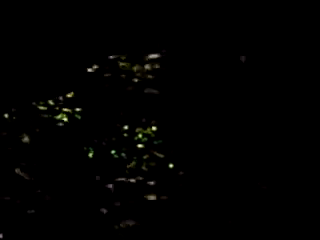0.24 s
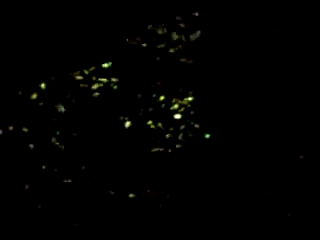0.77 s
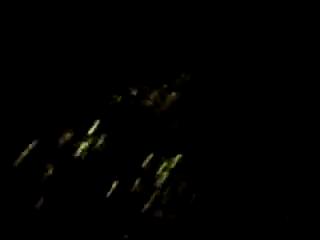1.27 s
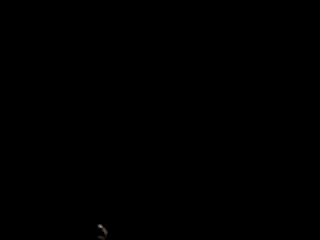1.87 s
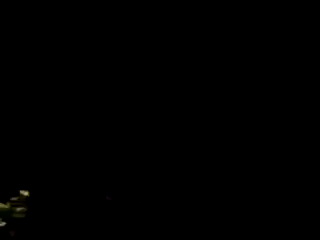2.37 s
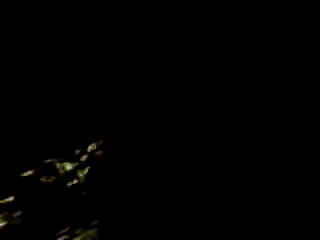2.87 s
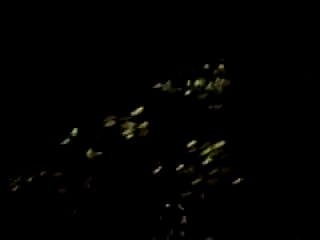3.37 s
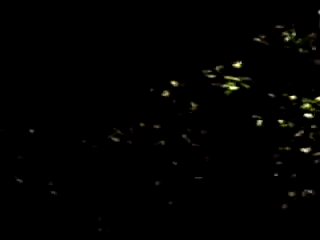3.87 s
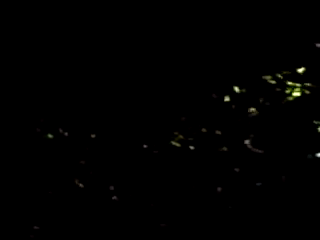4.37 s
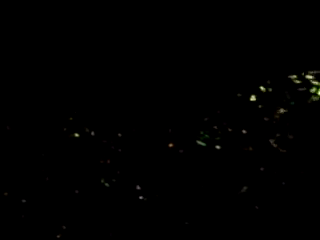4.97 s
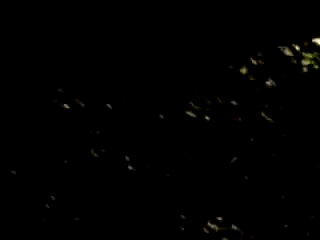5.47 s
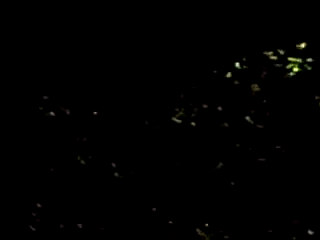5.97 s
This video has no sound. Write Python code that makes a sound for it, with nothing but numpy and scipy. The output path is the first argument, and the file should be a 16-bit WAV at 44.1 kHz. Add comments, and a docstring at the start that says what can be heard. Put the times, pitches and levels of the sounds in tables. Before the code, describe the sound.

Toads trill and far frogs click above a low rumble, while a nearby frog clicks loudly once through and another briefly croaks.

```python
"""Low rumble, a distant engine's hum and toads trilling near 2 kHz, heard from a pond's edge at night.
Far frogs give rising runs of clicks, smeared by the trees. Close to the microphone one frog gives a
single run that slows, swells and rises in pitch: each click is a snap of the larynx that rings its
throat and its tightening vocal sac. Near the end another frog croaks once, in quick buzzy notes."""
import sys
import numpy as np
from scipy import signal
from scipy.fft import rfft, irfft
from scipy.io import wavfile

SR = 44100
rng = np.random.default_rng(int(sys.argv[2]) if len(sys.argv) > 2 else 0)


def generate_wav(sig):
    """Save sig (samples, or channels by samples) to the path in sys.argv[1] as 16-bit PCM at SR."""
    pcm = np.round(np.clip(np.atleast_2d(sig).T, -1, 1) * 32767).astype(np.int16)
    wavfile.write(sys.argv[1], SR, pcm)


N = 274743
T = np.arange(N) / SR
FREQS = np.fft.rfftfreq(N, 1 / SR)


def undb(db):
    """Decibels to gain."""
    return 10 ** (np.asarray(db) / 20)


def level(x, db):
    """Scale to an rms level."""
    return x * undb(db) / np.sqrt(np.mean(x ** 2))


def fader(points):
    """Gain at every sample from (time_s, level_db) points."""
    time_s, db = np.transpose(points)
    return undb(np.interp(T, time_s, db))


def colour(points):
    """Gain at every frequency from (frequency_hz, level_db) points."""
    hz, db = np.transpose(points)
    return undb(np.interp(np.log(FREQS + 1), np.log(hz), db))


def resonance(f, hz, width_hz):
    """Gain of a steep resonance at the frequencies f."""
    return 1 / (1 + ((f - hz) / width_hz * 2) ** 2 / 2) ** 2


def causal(gain):
    """Minimum-phase filter with the given gains: nothing sounds before the blow."""
    cepstrum = irfft(np.log(gain), N)
    fold = np.concatenate([[1], 2 * (T[1:] < N / SR / 2)])
    return np.exp(rfft(cepstrum * fold))


def noise(gain):
    """Noise of rms 1 with the given spectrum."""
    return level(irfft(rfft(rng.standard_normal(N)) * gain, N), 0)


def band(hz, width_hz):
    """A band of noise of rms 1."""
    return noise(resonance(FREQS, hz, width_hz))


def drift(rate_hz):
    """Smooth random drift of spread 1."""
    return noise(np.exp(-(FREQS / rate_hz) ** 2) * (FREQS > 0))


def add(out, start_s, sound):
    """Mix a sound in, if it starts within the scene."""
    i = int(start_s * SR)
    if 0 <= i < N:
        out[i:i + len(sound)] += sound[:N - i]


def night():
    """Low rumble and smooth hiss all round, with the farthest callers blended into bands."""
    # spectrum of the night air: frequency_hz, relative_db
    air_spectrum = [(20, 0.5), (40, -4.5), (62, -6.5), (85, 2), (140, -6), (250, -8), (370, -15),
                    (520, -17.5), (700, -21.5), (950, -28.5), (1500, -31.5), (2700, -35.5), (4300, -37),
                    (11000, -39)]
    # a far group of callers that swells and sinks: time_s, level_db
    group_levels = [(0, -67.5), (1.5, -69.5), (2.3, -64), (3.6, -65), (4.4, -72), (5.5, -73), (6.23, -65.5)]
    # far chorus blended to a murmur: centre_hz, width_hz, level_db
    chorus_bands = [(617, 40, -63), (1863, 270, -61.5), (3246, 770, -62.5)]
    air = undb(-42) * noise(colour(air_spectrum))
    group = fader(group_levels) * band(2310, width_hz=400)
    chorus = sum(undb(db + 2.1 * drift(3.1)) * band(hz, width) for hz, width, db in chorus_bands)
    return air + group + chorus


def engine():
    """A far engine's firing tone and a deep throb, beside the drones of traffic and other machines."""
    # the firing's loudness as it carries on the air: time_s, level_db
    firing_levels = [(0, -44), (.7, -47), (1.1, -42), (1.9, -40.5), (2.2, -40), (2.7, -36.5), (2.97, -48),
                     (3.2, -40.5), (4.1, -38.5), (4.65, -41.5), (4.85, -33.5), (5.15, -35), (6.23, -37.5)]
    # the throb, about an octave below the firing: time_s, level_db
    throb_levels = [(0, -40), (.7, -55), (2.0, -47), (2.6, -52), (2.9, -60), (3.2, -43.5), (3.65, -44),
                    (3.95, -63), (4.3, -41), (4.97, -57), (5.15, -41), (6.23, -50)]
    # a higher traffic drone that recedes and returns: time_s, level_db
    traffic_levels = [(0, -38), (1.0, -46), (2.5, -47), (5.7, -47.5), (6.23, -42.5)]
    # steady hums of distant machinery: centre_hz, width_hz, level_db
    hum_bands = [(75.2, 30, -46), (173.3, 18, -56)]
    firing = level(wavering_tone(93.64, spread_hz=0.44, rate_hz=1.24), -0.68)
    firing += undb(-9.5) * band(99.6, width_hz=27)
    throb = level(wavering_tone(48.4, spread_hz=0.54, rate_hz=1.15), -0.42)
    traffic = band(120.1, width_hz=12.2) * fader(traffic_levels)
    hums = sum(undb(db) * band(hz, width) for hz, width, db in hum_bands)
    return firing * fader(firing_levels) + throb * fader(throb_levels) + traffic + hums


def wavering_tone(hz, spread_hz, rate_hz):
    """A sine whose pitch wanders about hz."""
    return np.sin(2 * np.pi * np.cumsum(hz + spread_hz * drift(rate_hz)) / SR)


def toad(hz, pulses_per_s, unsteady):
    """One far toad: a wavering tone cut into quick pulses, with scatter from the trees."""
    cycle = np.cumsum(pulses_per_s * (1 + unsteady * drift(5.36))) / SR
    pulse = np.abs(np.sin(np.pi * cycle)) ** 2.9
    tone = wavering_tone(hz, spread_hz=22, rate_hz=29.9)
    voice = undb(1.6 * drift(37)) * pulse * tone
    return voice + undb(-3) * foliage(voice, t60_s=0.14)


def foliage(x, t60_s):
    """Diffuse scatter that reaches the microphone from leaves and trunks."""
    tail = rng.standard_normal(SR) * np.exp(-np.log(1000) * T[:SR] / t60_s)
    return signal.fftconvolve(x, tail / np.linalg.norm(tail))[:N]


def trills():
    """Toads across the pond trill at nearly the same pitch and beat against each other."""
    # toads behind the nearest one: pitch_hz, pulses_per_s, relative_db
    back_row = [(1889, 34, 2), (1890, 31, -12), (1770, 15, -15.5), (2000, 47, -17)]
    behind = sum(undb(db) * toad(hz, rate, unsteady=0.094) for hz, rate, db in back_row)
    nearest = toad(hz=1955, pulses_per_s=32.5, unsteady=0.048)
    return level(nearest, -58.5) + level(behind, -60.5)


def far_frogs():
    """Slowing, rising runs of clicks from far off, each smeared by its own path through the trees."""
    # the clearest runs: start_s, first_pitch_hz, relative_db
    clear_runs = [(-.14, 2910, 6), (-.15, 3290, 5), (.3, 3190, 2), (1.28, 3240, 4), (1.58, 2905, 5),
                  (2.0, 3260, -2.5), (2.38, 2990, 2.5), (2.83, 3200, 1), (3.25, 2900, 4), (3.58, 3210, 3),
                  (4.05, 3000, 0), (4.52, 2900, 5.5), (4.55, 3230, 4.5), (4.88, 2990, 3.5),
                  (5.35, 3260, -1.5), (5.86, 3080, 4.5)]
    # one more frog, higher and faint, repeats its run at loose intervals
    faint_runs = [(1.64 * k + 0.066 * rng.standard_normal(), 3400, -1) for k in (1, 2, 3)]
    run_s, rise_hz, swell_db = 0.53, 286, 4
    out = np.zeros(N)
    for start_s, first_hz, db in clear_runs + faint_runs:
        for progress in np.linspace(0, 1, 14):
            late, detune = rng.standard_normal(2)
            click = ring(first_hz + rise_hz * progress + 20 * detune, peak_s=0.0016, sharp=0.98)
            smeared = foliage(click, t60_s=0.32)
            add(smeared, 0, undb(-13) * click)  # the weak direct path
            click_s = start_s + run_s * progress ** 1.2 + 0.003 * late
            add(out, click_s, undb(db - swell_db * (1 - progress) ** 2) * smeared)
    return level(out, -60.5)


def ring(hz, peak_s, sharp):
    """A membrane's ring that swells to its peak and dies."""
    t = T[:SR // 20]
    envelope = (t / peak_s * np.exp(1 - t / peak_s)) ** sharp
    return envelope * np.sin(2 * np.pi * hz * t)


def near_frog():
    """Close by, snaps ring a frog's throat and vocal sac; as the sac tightens, ticks turn into pings."""
    # the run of clicks: start_s, level_db
    clicks = [(0.7822, -30), (0.806, -28), (0.836, -25.5), (.866, -26.5), (0.8972, -23), (.932, -18),
              (.97, -17), (1.0102, -15), (1.0555, -14), (1.1038, -13), (1.1563, -12.5), (1.2072, -12.5),
              (1.255, -13), (1.3047, -14.5), (1.3122, -21.5)]
    # throat modes with the sac tight, at 3680 Hz: pitch_hz, relative_db, time_to_peak_s
    throat_modes = [(1738, -11.5, 0.0019), (1948, -11.5, 0.0017), (5660, -11.5, 0.001)]
    # after-rings of the sac: delay_s, relative_db, base_time_to_peak_s
    after_rings = [(.0045, -13, 0.0015), (.0079, -8.5, 0.0032), (0.02, -53, 0.0035)]
    # spectrum of the snap that starts each click: frequency_hz, gain_db
    snap_spectrum = [(1000, -35.5), (1500, -3), (2100, 9.5), (2500, 3.5), (2950, -4), (3500, -9),
                     (4400, -9), (5000, -0.5), (6200, 2.5), (6600, -7), (7100, -5.5), (8800, -11),
                     (11000, -20)]
    slack_hz, full_hz, rise_hz_per_s, rise_from_s = 3333, 3716, 970, 0.83
    out, snaps = np.zeros(N), np.zeros(N)
    t = T[:SR // 50]
    for start_s, db in clicks:
        sac_hz = np.clip(slack_hz + rise_hz_per_s * (start_s - rise_from_s), slack_hz, full_hz)
        tight = np.clip((sac_hz - 3340) / 220, 0, 1)
        for hz, mode_db, peak_s in throat_modes:
            throat = ring(hz * (sac_hz / 3680) ** 0.96, peak_s, sharp=1)
            add(out, start_s, undb(db + mode_db - 4.9 * (1 - tight)) * throat)
        # a tighter sac peaks later and lingers longer
        swell_s, linger = 0.0005 + 0.0009 * tight, 0.69 + 0.61 * tight
        add(out, start_s, undb(db) * ring(sac_hz, swell_s, sharp=swell_s / 0.0012))
        for delay_s, after_db, peak_s in after_rings:
            scatter_db, detune = rng.standard_normal(2)
            after_ring = ring(sac_hz + 18 * detune, peak_s * linger, sharp=3.7)
            add(out, start_s + delay_s, undb(db + after_db + scatter_db) * after_ring)
        # the larynx snaps open, harder with effort, then rasps, longer as the sac tightens
        effort = ((sac_hz - slack_hz) / (full_hz - slack_hz)) ** 2
        snap_db = -7.5 + 0.34 * db + 3.5 * effort
        rasp = rng.standard_normal(len(t)) * np.exp(-t / (0.001 + 0.0019 * tight))
        add(snaps, start_s, undb([snap_db]))
        add(snaps, start_s, undb(snap_db - 15.5) * rasp)
    out += irfft(rfft(snaps) * causal(colour(snap_spectrum)), N)
    # so small a body radiates no bass
    out = signal.sosfilt(signal.butter(5, 1450, "high", fs=SR, output="sos"), out)
    return out + undb(-14) * foliage(out, t60_s=0.13)


def croak():
    """Another frog's quick, buzzy notes swell and sag in pitch through its throat's resonances."""
    # the notes, the last a weak after-note: start_s, length_s, first_pitch_hz, level_db
    notes = [(5.9, .030, 413, -33.5), (5.930, 0.024, 387.5, -35.5), (5.950, 0.01, 420, -34.5),
             (5.985, 0.015, 427, -46)]
    # resonances of the throat: centre_hz, width_hz, relative_db
    formants = [(760, 130, 5), (1397, 450, -7.5), (1890, 290, -6.5), (2270, 270, -20)]
    sag_hz_per_s, harmonics = 3000, np.arange(1, 8)[:, None]

    def throat(f):
        """The throat's gain at the frequencies f."""
        return sum(undb(db) * resonance(f, hz, width) for hz, width, db in formants)

    out = np.zeros(N)
    waver = 1 + 0.0089 * drift(250)
    rasp = undb(-11) * noise(throat(FREQS))
    for start_s, length_s, first_hz, db in notes:
        during = (T >= start_s) & (T < start_s + length_s)
        t = T[during] - start_s
        pitch_hz = (first_hz - sag_hz_per_s * t) * waver[during]
        phase = 2 * np.pi * np.cumsum(pitch_hz) / SR
        gains = throat(harmonics * pitch_hz)
        buzz = np.sum(gains * np.sin(harmonics * phase), axis=0)
        buzz /= np.sqrt(np.sum(gains ** 2, axis=0) / 2)  # rms 1 at any pitch
        out[during] += undb(db) * np.sin(np.pi * t / length_s) * (buzz + rasp[during])
    return out + undb(-14) * foliage(out, t60_s=0.2)


def scene():
    """All callers over the night's floor, at one microphone on the bank."""
    return (near_frog() + far_frogs() + trills() + croak() + engine() + night())[None]


def record(dry):
    """The recorder cuts the top steeply."""
    top_hz = 11150
    return signal.sosfilt(signal.ellip(10, 0.2, 70, top_hz, fs=SR, output="sos"), dry)


dry = scene()
out = record(dry)
generate_wav(out)
```